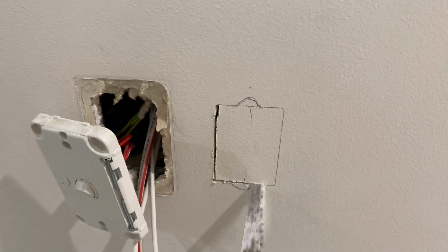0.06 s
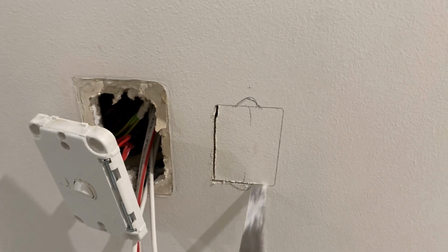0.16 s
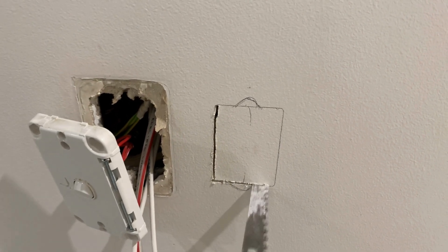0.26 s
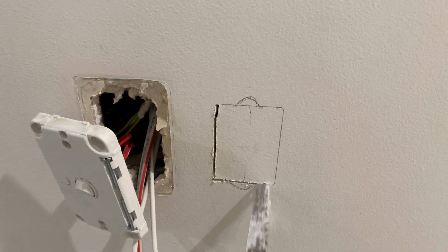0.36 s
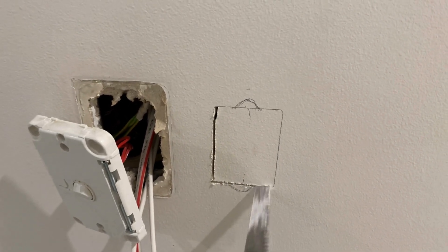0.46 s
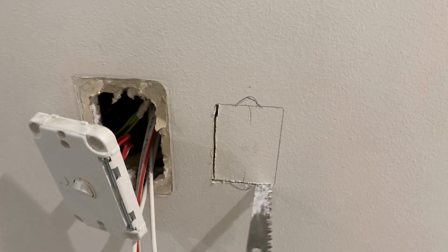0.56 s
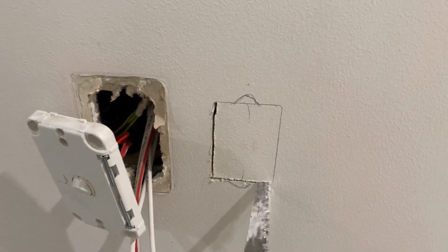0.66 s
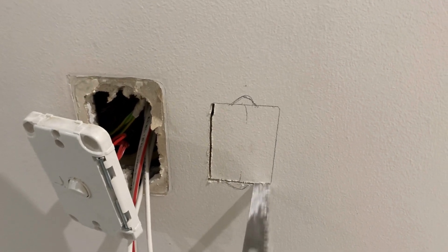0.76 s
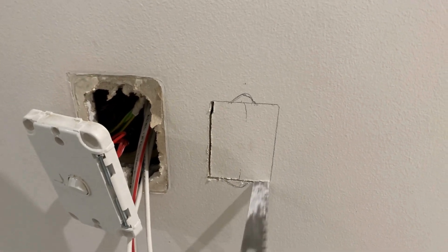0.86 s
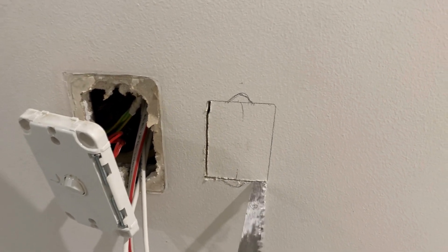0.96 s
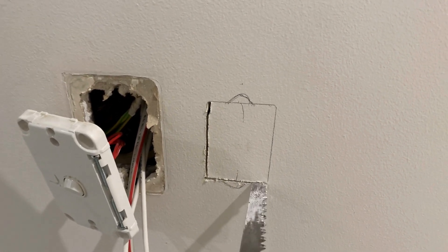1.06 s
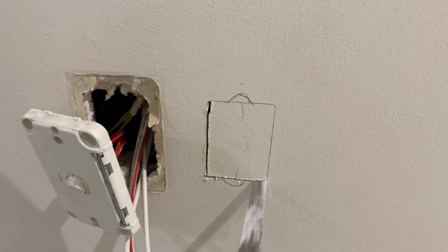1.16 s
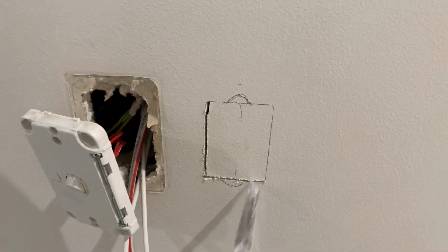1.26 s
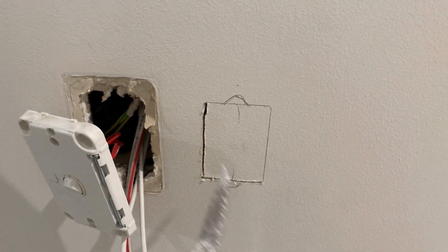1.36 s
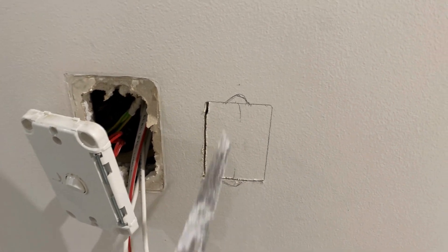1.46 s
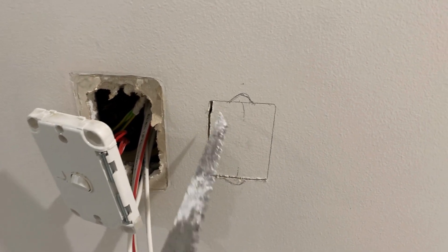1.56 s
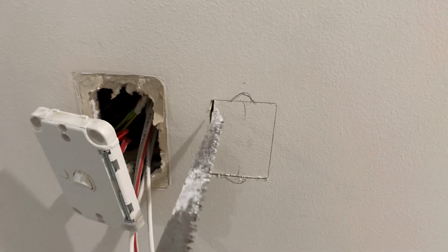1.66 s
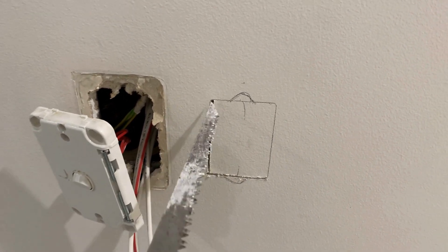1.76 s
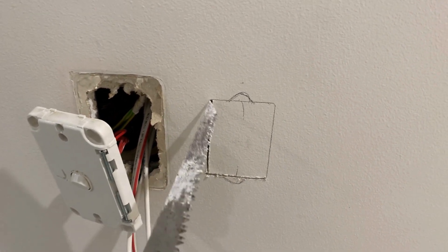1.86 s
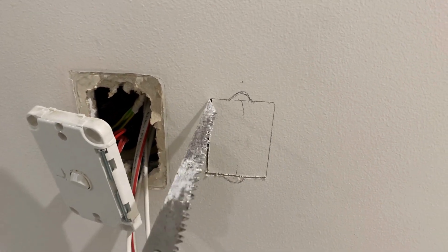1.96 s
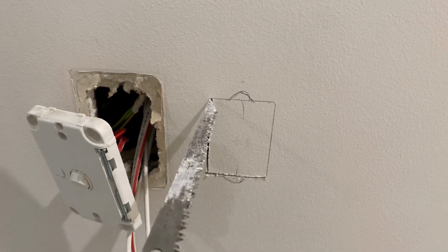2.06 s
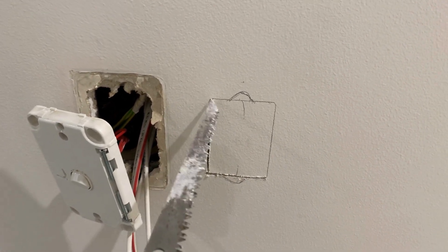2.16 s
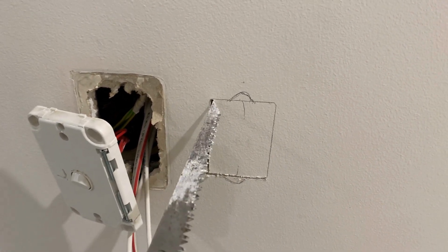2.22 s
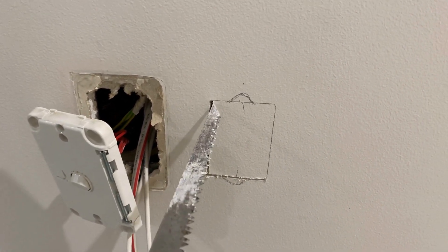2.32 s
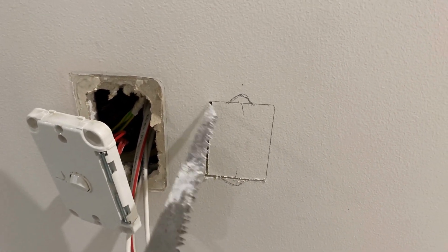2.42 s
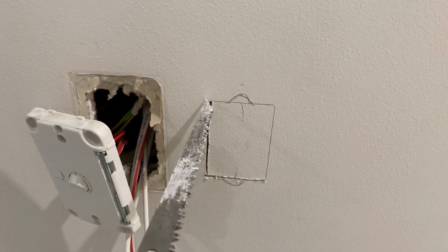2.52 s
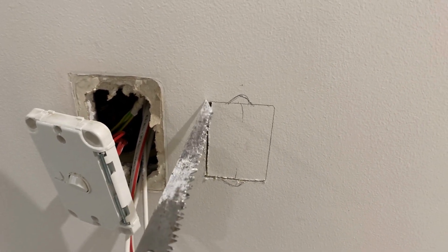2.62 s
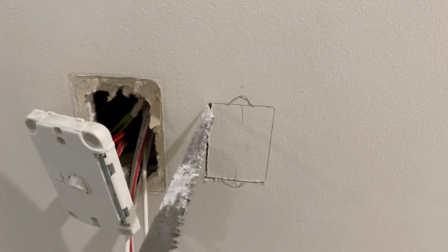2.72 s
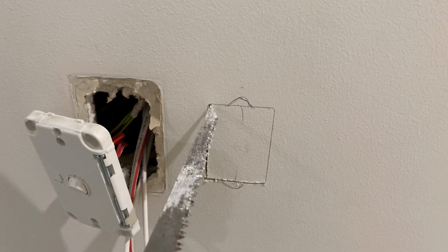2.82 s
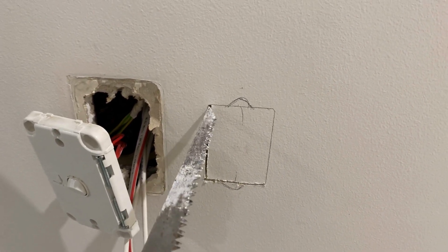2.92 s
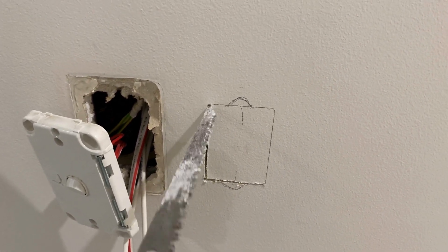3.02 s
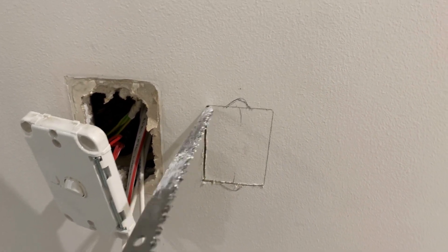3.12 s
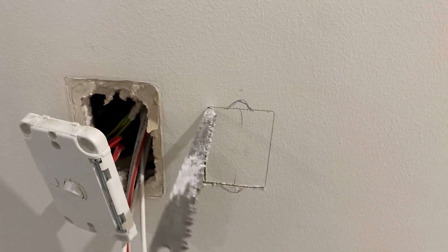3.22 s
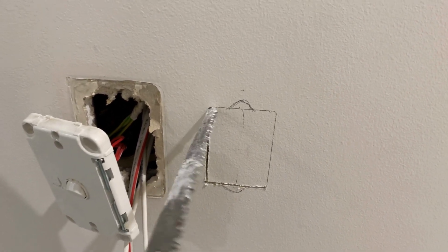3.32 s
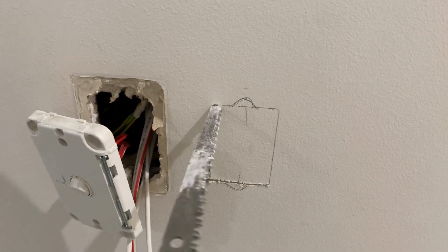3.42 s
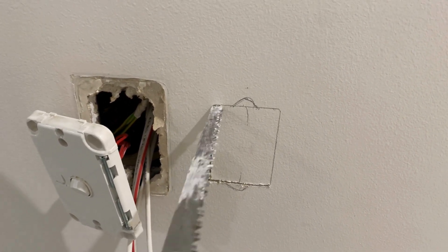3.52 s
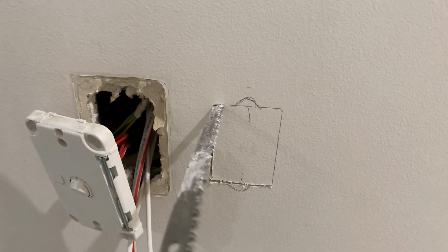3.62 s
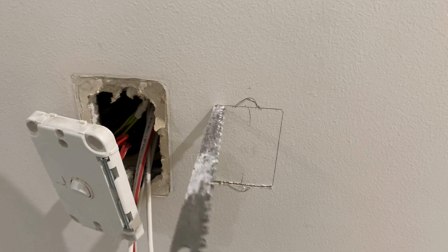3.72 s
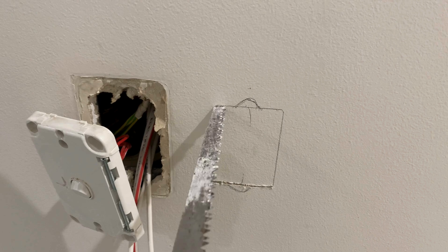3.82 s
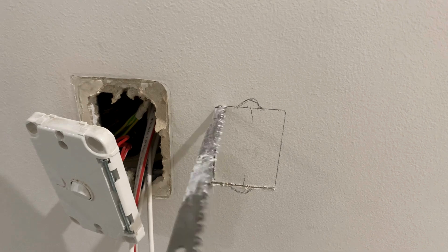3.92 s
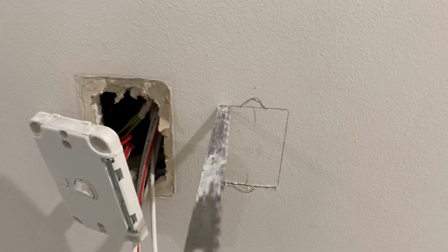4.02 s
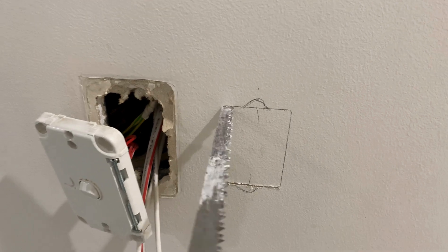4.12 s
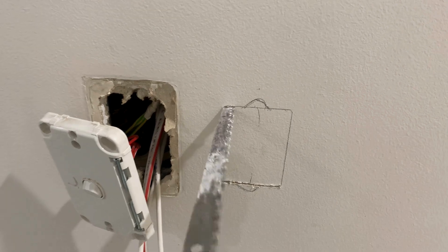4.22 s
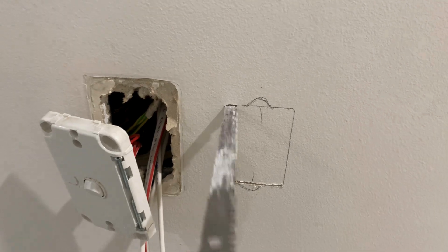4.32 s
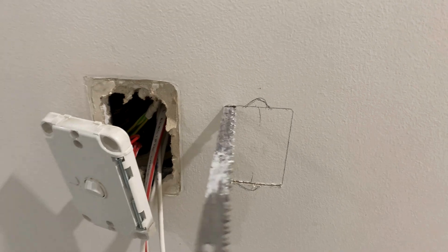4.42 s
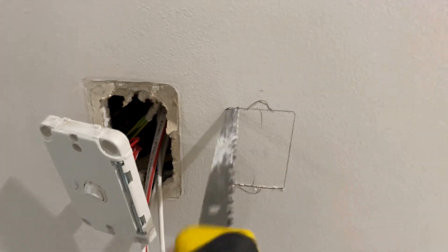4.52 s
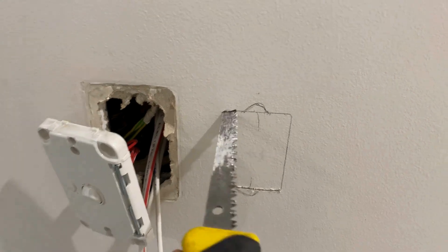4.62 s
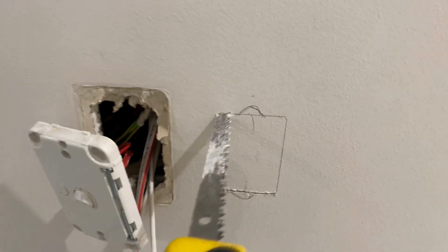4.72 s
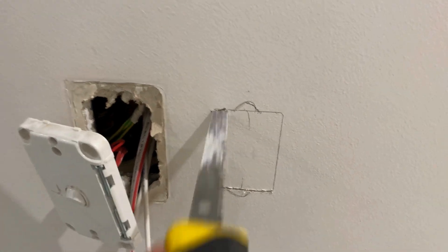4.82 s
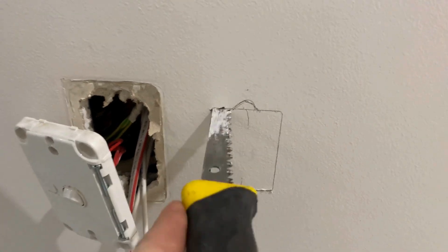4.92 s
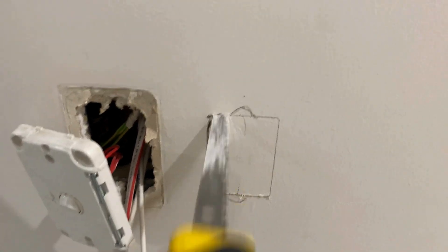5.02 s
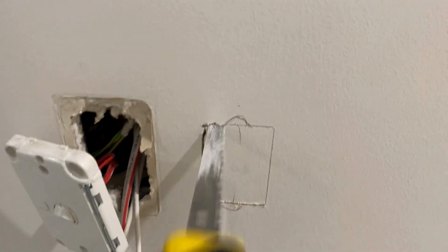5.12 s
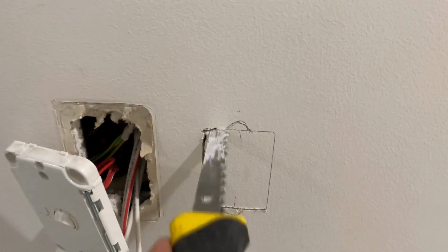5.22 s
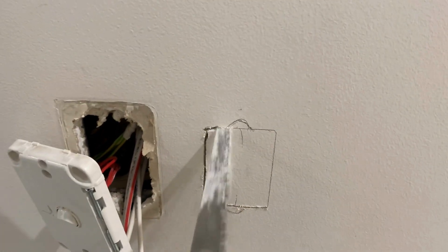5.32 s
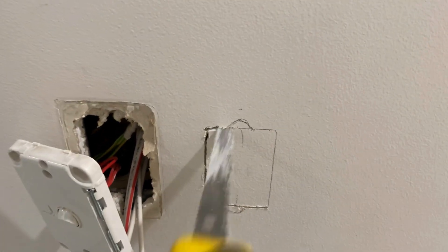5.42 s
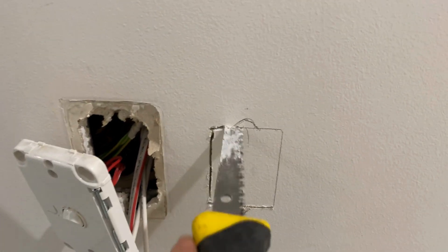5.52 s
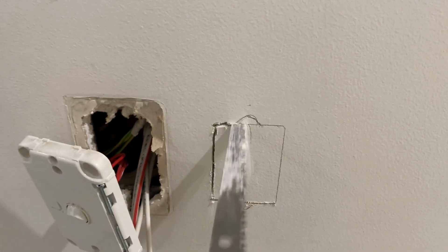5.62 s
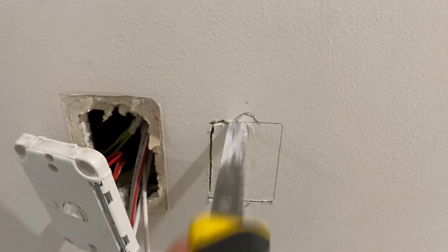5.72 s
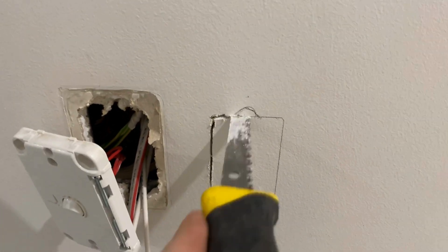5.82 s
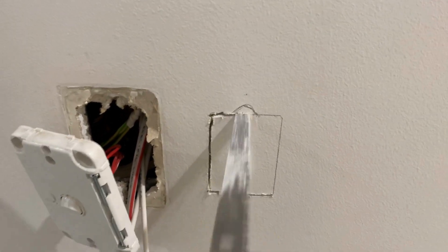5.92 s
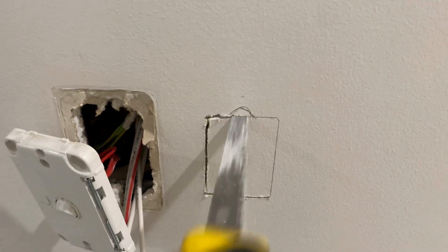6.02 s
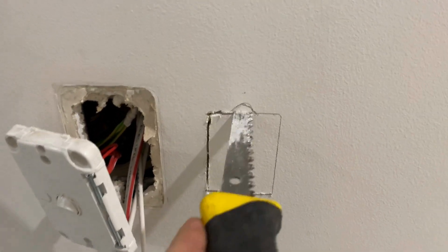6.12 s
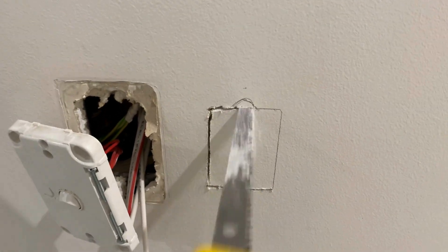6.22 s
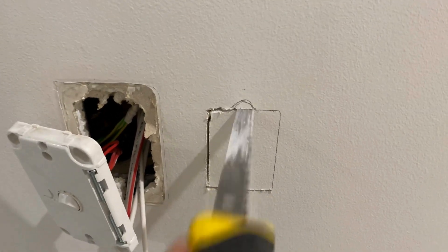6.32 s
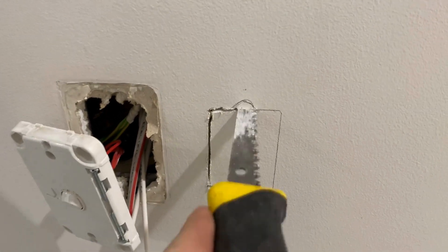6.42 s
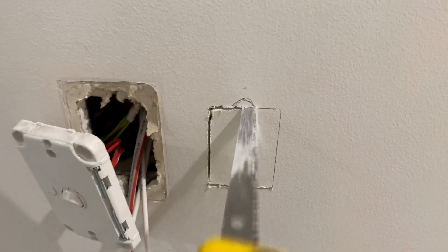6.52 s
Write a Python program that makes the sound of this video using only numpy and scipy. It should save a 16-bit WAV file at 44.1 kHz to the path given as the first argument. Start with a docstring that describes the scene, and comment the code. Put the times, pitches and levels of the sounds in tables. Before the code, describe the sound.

A steel jab saw works in a hollow gypsum wall, heard close in stereo with short indoor echoes. About seven strokes a second thump and rasp, die away, and leave near silence with tiny taps. Quick faint scrapes start a new slot, then loud gritty strokes make the sheet boom until the end, mixed with irregular bumps and brittle crumbs breaking.

```python
"""Quick, rough saw strokes thump and rasp: a hand jab saw cuts a socket hole in a hollow plasterboard wall.
The bout dies away and the tip flicks free; after faint ticks and presses it nibbles lightly, then saws hard.
Each stroke is a row of tooth catches that ring the wall: it thumps and crunches, and gypsum grit rasps
along the steel blade. Bumps, squeaks and snapping crumbs join in, and the sheet booms on the air behind it.
A phone close by hears it through two microphone ports in a small room with quiet air and a faint hum."""
import sys
import numpy as np
from scipy import signal
from scipy.fft import rfft, irfft
from scipy.io import wavfile
from scipy.ndimage import uniform_filter1d

SR = 44100
rng = np.random.default_rng(int(sys.argv[2]) if len(sys.argv) > 2 else 0)


def store_pcm(level_fs):
    """Save levels as 16-bit WAV."""
    pcm = np.round(np.clip(level_fs, -1, 1) * 32767).astype(np.int16)
    wavfile.write(sys.argv[1], SR, np.atleast_2d(pcm).T)


N = 289737
RING = SR // 5  # how long a body may ring, in samples
SLIDE_S = .014  # the blade already slides this long before the teeth catch, and as long after

# Strokes of the blade. Each row: start in seconds, length in seconds, force in dB, bite from 0 (the teeth
# slide over the gypsum) to 1 (they dig in), resonance of the slot in Hz, wall resonance that the stroke
# favours in Hz, push that makes the sheet shudder in dB.
STROKES = [(-.02, .115, -4.5, 0.9, 775, 175, -18), (0.099, .14, -3, .95, 730, 224, -21.5),
           (0.272, .12, -4.5, 0.6, 750, 176, -19.5), (.399, .135, -3.5, 1, 690, 323.7, -19.5),
           (.572, .11, -8.5, 0.8, 671, 179, -21), (0.688, .12, -6, .75, 667, 224.4, -19.5),
           (0.832, .13, -9, .6, 698, 224, -25), (0.956, .11, -11.5, 0.6, 760, 172.6, -31.5),
           (1.096, .125, -12.5, 0.52, 760, 174, -36), (1.213, .09, -21, 0.58, 686, 180, -36),
           (2.989, .074, -45, 0.4, 706, 240, -58), (3.062, .12, -33.5, 0.63, 950, 248, -62),
           (3.146, 0.085, -27.5, 0.1, 950, 338, -60), (3.237, 0.096, -25, 0.17, 905, 260, -55),
           (3.319, 0.11, -24.5, 0.07, 1010, 238, -57.5), (3.414, .083, -24.5, 0.44, 910, 170, -56),
           (3.484, 0.081, -27, 0.35, 1450, 315, -50), (3.572, 0.071, -23.5, 0.35, 1400, 241, -47),
           (3.634, 0.06, -25, 0.24, 1510, 256, -43), (3.727, .047, -29, 0.86, 1450, 322, -49),
           (3.803, .04, -33, 0, 1400, 251, -55), (3.872, 0.0563, -24.5, 0.47, 1500, 253, -49),
           (3.934, 0.051, -22, 0.4, 1500, 243, -48), (4.018, 0.095, -25, .54, 1490, 260, -45),
           (4.174, .049, -24.5, .5, 1530, 322, -48.5), (4.217, .067, -23, 0.46, 1540, 326, -53.5),
           (4.328, 0.1, -16, 0.6, 1500, 218, -31.5), (4.467, .132, -2, 0.6, 833, 225, -19.5),
           (4.694, .08, -8, 0.18, 900, 121, -25.5), (4.797, .13, 1.5, 0.7, 930, 219.6, -28),
           (4.97, .115, -1.5, .48, 790, 147, -19.5), (5.098, .112, 2, 0.6, 1260, 325.6, -21),
           (5.236, .13, 1.5, 0.4, 780, 146, -23), (5.381, .122, 3, .78, 940, 325, -27.5),
           (5.542, .11, -1.5, .25, 870, 247, -18.5), (5.676, .128, 2, .88, 740, 162, -32),
           (5.837, .14, 1, 0.6, 750, 157, -21.5), (5.973, .14, .5, .89, 693, 166, -33),
           (6.149, .125, -1, 0.4, 690, 132, -22), (6.292, .125, -1.5, 1, 730, 237, -29.5),
           (6.434, .13, -1, .52, 737, 138, -17.5)]
# The blade bumps in the slot or a tooth snags hard. Each row: start in seconds, peak level in dB,
# crunch against thud in dB, pitch of the thud in Hz.
BUMPS = [(0.059, -12, -13, 165.7), (0.113, -20.5, -9, 315), (.161, -17, -25, 320), (0.185, -6, -25, 217),
         (0.292, -18, -1, 219), (.327, -11.5, -7.5, 179), (.474, -14.5, -9, 322), (0.49, -2.5, -12.5, 226),
         (.59, -4, -14, 128), (.662, -10, -14, 169), (.736, -7, -8, 231), (0.938, -8, -24, 213.6),
         (1.125, -17, -17.5, 192.6), (1.886, -37.5, -18, 170.3), (2.275, -42.5, -11, 228),
         (2.421, -47, -21.5, 162), (2.484, -37.5, -10, 160), (2.638, -44.5, -4.5, 235),
         (2.896, -37.5, -14, 163), (2.982, -35.5, -36, 174), (3.234, -35.5, -13, 243),
         (3.283, -36, -7, 250.7), (3.422, -33.5, -17, 333), (3.497, -39, -4, 325), (3.578, -44, -2, 255.3),
         (3.879, -38, 16, 320), (4.033, -33.5, -3, 261), (4.19, -29, -14.5, 324), (4.334, -34, 10, 213),
         (4.381, -16.5, -28, 222), (4.47, -27.5, 1, 222), (4.545, -10, -4, 232), (4.751, -11.5, -44, 134),
         (4.825, -18, -27, 223), (4.849, -8, -11.5, 212), (4.997, -14, -8, 258), (5.045, -12.5, -14, 214),
         (5.111, -28, 0, 226), (5.144, -14, 11, 346), (5.3, -4, -20, 151), (5.421, -27, -7, 228),
         (5.568, -13, -10, 245), (5.734, -7.5, 2, 173), (5.852, -6.5, -16, 227.5), (5.886, -14, -12, 171),
         (5.916, -7, -12, 167), (6.024, -13.5, -7, 310), (6.062, -10, -12, 169.6),
         (6.196, -4.5, -15.5, 131.3), (6.313, -7.5, -4, 125.7), (6.331, -10, -18, 243),
         (6.354, -7, -13, 151.5)]
# Ways in which a body rings. Each row: pitch in Hz, width in Hz (wider dies sooner), strength in dB.
SHEET_MODES = [(118, 20, 3.5), (140, 24, -2), (160, 22, -1), (177, 18, -3)]  # the whole sheet between its studs
PANEL_MODES = [(216, 19, 2.5), (234, 22, -1), (253, 22, 1), (325, 20, 2.5)]  # the panel around the cut
BOARD_MODES = [(461, 28, 4.5), (532, 22, 3), (565, 24, -3), (630, 28, -.5), (700, 70, -3.5),
               (775, 50, -1.5), (877, 34, -1.5), (975, 36, -8.5), (1040, 40, -11), (1172, 50, -8.5),
               (1290, 46, -7), (1420, 42, -4.5), (1528, 44, -6), (1642, 44, -5), (2240, 120, -6.5)]  # the board bending at the slot
BLADE_MODES = [(2130, 430, 14.5), (2686.3, 130, 0), (2950, 80, 2.5), (3470, 52, 12), (3790, 19, 12),
               (4620, 30, -7.5), (7600, 110, -1.5), (9300, 280, -4), (11300, 360, -4), (13400, 590, -5.5)]  # the steel blade, ringing faintly


def undb(db):
    """Decibels to gain."""
    return 10 ** (np.asarray(db) / 20)


def unit(x):
    """Scale to rms 1."""
    return x / np.sqrt(np.mean(x ** 2) + 1e-18)


def read(points, hz):
    """Read (Hz, value) points on a log-frequency axis."""
    f, value = np.transpose(points)
    return np.interp(np.log(hz + 1), np.log(f + 1), value)


def add(out, x, start):
    """Mix x into out from a time in seconds."""
    i = int(start * SR)
    x = x[max(-i, 0):len(out) - i]
    out[max(i, 0):max(i, 0) + len(x)] += x


def colour(points, size=1024):
    """Short impulse response with the given spectrum; it starts at once (minimum phase)."""
    level_db = read(points, np.fft.rfftfreq(size, 1 / SR))
    cepstrum = np.fft.irfft(np.log(undb(level_db)))
    cepstrum[1:size // 2] *= 2
    cepstrum[size // 2 + 1:] = 0
    return irfft(np.exp(rfft(cepstrum)))


def ring(modes, scatter_db=2.0, detune=.008):
    """Impulse response of damped modes; their balance and tuning shift with the point of contact."""
    hz, width, db = np.transpose(modes)[:, :, None]
    chance = rng.standard_normal((2, len(modes), 1))
    t = np.arange(RING) / SR
    gain = undb(db + scatter_db * chance[0]) * 2 * np.pi * width / SR
    swing = np.cos(2 * np.pi * hz * (1 + detune * chance[1]) * t)
    modal = np.sum(gain * np.exp(-np.pi * width * t) * swing, axis=0)
    # a body radiates little outside the range of its modes
    edges = [.83 * hz.min(), min(1.17 * hz.max(), .45 * SR)]
    return signal.sosfilt(signal.butter(3, edges, "band", fs=SR, output="sos"), modal)


def knock(hz, width_hz):
    """Impulse response of one wall resonance, driven right at the blade so that it speaks at once."""
    t = np.arange(RING) / SR
    swing = np.exp(-np.pi * width_hz * t) * np.sin(2 * np.pi * hz * t)
    return signal.sosfilt(signal.butter(2, hz / 2, "high", fs=SR, output="sos"), swing)


def swept(x, hz, width_hz):
    """A resonance whose centre can move; gain 1 at the centre."""
    turn = np.exp(2j * np.pi * np.cumsum(hz) / SR)
    keep = np.exp(-np.pi * width_hz / SR)
    return 2 * np.real(turn * signal.lfilter([1 - keep], [1, -keep], x / turn))


def sound(force, response):
    """A force rings a body; the whole sound is scaled to rms 1 over the length of the force."""
    y = np.zeros(len(force) + RING)
    add(y, signal.fftconvolve(force, response), 0)
    return y / np.sqrt(np.sum(y ** 2) / len(force) + 1e-18)


def grains(n, per_s, spread_db):
    """Random clicks, a few larger than the rest."""
    hit, rarity, side = rng.random((n, 3)).T
    size = undb(-spread_db * np.log(np.maximum(rarity, .02)))
    return unit((hit < per_s / SR) * size * np.sign(side - .5))


def spots(n):
    """A value that wanders as the teeth meet harder and softer spots; spread near 1."""
    patch_s = 0.01215  # time that one spot spends under the teeth
    hardness = rng.standard_normal(40)
    return np.interp(np.arange(n) / SR / patch_s, np.arange(len(hardness)), hardness)


def bout_at(time):
    """The row of the bout of sawing that is under way."""
    # Sawing along the bottom of the hole, nibbling a new slot, sawing along the top. Each row:
    # start in seconds, place of top speed in a stroke from 0 to 1, boom in dB, its change as the cut grows
    # in dB per second, thud in dB, favoured wall resonance in dB, board modes above 1000 Hz in dB,
    # blade ring in dB.
    bouts = [(-.05, 0.55, -5, 1, -16.5, -15, -2, -2), (3, .32, -27.5, 6, -22, -25, -16, -6),
             (4.4, .47, -17, 4.5, -24, -22, -2, -9)]
    return bouts[sum(time >= bout[0] for bout in bouts[1:])]


def blade_speed(length, top):
    """The blade speeds up from rest and stops again; 1 at top speed."""
    n = int(length * SR)
    along = np.arange(n) / n
    phase = np.interp(along, [0, np.clip(top, .2, .8), 1], [0, .5, 1])
    return np.sin(np.pi * phase) + 1e-6


def teeth(speed, rate_hz, jitter, scatter_db):
    """One impulse for each tooth that breaks through the gypsum, unevenly spaced and sized."""
    travel = np.cumsum(speed / np.mean(speed)) * rate_hz / SR
    chance = rng.standard_normal((64, 2))
    at = np.searchsorted(travel, np.arange(len(chance)) + .5 + jitter * chance[:, 0])
    force = np.zeros(len(speed) + 1)
    force[at] = undb(scatter_db * chance[:, 1])
    return force[:-1]  # teeth beyond the stroke's end fell on the last sample


def rasp(crumble, length, top, force_db, blade_db):
    """Grit rubs along the blade and rings it; a light stroke rolls fewer grains."""
    # The hiss of the grit. Each row: frequency in Hz, level in dB.
    grit = [(400, -31), (1200, 4.5), (1900, 9.5), (2300, 3.5), (2900, 5), (3700, 6.5), (5200, 4),
            (7000, -0.5), (9500, 2), (12500, 0.5), (15500, -0.5)]
    speed = blade_speed(length + 2 * SLIDE_S, top)
    n = len(speed)
    supply = np.ones(n)
    add(supply, 2.0 * crumble, SLIDE_S)
    rolling = grains(n, per_s=12000 * undb(0.23 * force_db), spread_db=3.0)
    rub = rolling * supply * speed ** 1.09 * undb(1.5 * spots(n))
    blade = sound(rub, ring(BLADE_MODES, scatter_db=4.5, detune=0.011))
    return sound(rub, colour(grit)) + undb(blade_db) * blade


def stroke(start, length, force_db, bite, slot_hz, wall_hz):
    """Teeth catch one by one and ring sheet, panel and board; grit rasps a little before and after."""
    # The dull noise under the crunch. Each row: frequency in Hz, level in dB per Hz.
    crunch_noise = [(380, -25), (560, -2), (850, 0), (1150, -5), (1600, -7), (1900, -14), (2400, -15),
                    (4000, -28), (9000, -48)]
    since, top, boom_db, boom_db_per_s, thud_db, favoured_db, upper_db, blade_db = bout_at(start)
    speed = blade_speed(length, top)
    n = len(speed)
    # typical catches per second, and the relative spread from stroke to stroke
    rate_hz = 148 * np.exp(.1 * rng.standard_normal())
    catches = teeth(1.185 + speed, rate_hz, jitter=.13, scatter_db=2.0)
    catches = catches * undb(2 * spots(n))  # hard and soft spots spread the force by 2 dB
    # after each catch the gypsum crumbles for a few ms
    crumble = unit(signal.lfilter([1], [1, -np.exp(-1 / (0.009 * SR))], catches))
    force = unit(catches) + 0.72 * crumble * grains(n, per_s=3200, spread_db=2.5)

    boom = sound(force * speed ** 0.05, ring(SHEET_MODES))
    thud = sound(force * speed ** 0.78, ring(PANEL_MODES))
    # where and how stiffly the blade is held favours one resonance of the wall
    favoured = sound(force * speed ** 0.13, knock(wall_hz, width_hz=24))

    # tilt across the board modes, in dB per octave: a deep bite favours the lower ones
    tilt_db = -9.5 * bite
    lowest_hz = BOARD_MODES[0][0]
    board = [(hz, width, db + tilt_db * np.log2(hz / lowest_hz) + upper_db * (hz > 1000))
             for hz, width, db in BOARD_MODES]
    blows = force * speed ** 1.35
    # the slot's resonance rises over the stroke and wanders from spot to spot
    centre_hz = slot_hz * np.exp(0.12 * np.linspace(-.5, .5, n) + 0.076 * spots(n))
    blows = blows + undb(1) * swept(blows, centre_hz, width_hz=360)
    crunch = undb(0.5) * sound(blows, ring(board, scatter_db=2.5, detune=0.0021))
    crunch = crunch + undb(-15.5) * sound(blows, colour(crunch_noise))

    # digging teeth shake the slot, not the whole sheet: less boom, more thud and crunch
    boom_db = boom_db + boom_db_per_s * (start - since) - 13 * bite
    wall = undb(boom_db) * boom + undb(favoured_db) * favoured
    wall = wall + undb(thud_db + 7 * bite) * thud + undb(-29.5 + 11.5 * bite) * crunch
    out = undb(-32) * rasp(crumble, length, top, force_db, blade_db)
    add(out, wall, SLIDE_S)
    return undb(force_db) * out


def sawing():
    """All strokes in turn, each heard from the moment the blade starts to slide."""
    out = np.zeros(N)
    for *row, _ in STROKES:
        add(out, stroke(*row), row[0] - SLIDE_S)
    return out


def shudder():
    """Strokes and bumps rock the sheet on the air of the cavity; the rocking builds and fades a little late."""
    # The sheet bouncing on the air behind it. Each row: pitch in Hz, width in Hz, strength in dB.
    cavity_modes = [(63.8, 7.5, -0.5), (92, 36, -37.5)]
    bump_db, bump_push_s = -23.5, 0.0077  # a bump's push: level against its peak, and for how long
    drag = np.zeros(N)
    for start, length, *_, shudder_db in STROKES:
        add(drag, np.full(int(length * SR), undb(shudder_db)), start)
    for start, db, *_ in BUMPS:
        add(drag, np.full(int(bump_push_s * SR), undb(db + bump_db)), start)
    for lag_s in (0.02, 0.06):
        keep = np.exp(-1 / (lag_s * SR))
        drag = signal.lfilter([1 - keep], [1, -keep], drag, zi=drag[:1])[0]
    boom = signal.fftconvolve(rng.standard_normal(N + RING), ring(cavity_modes))[RING:RING + N]
    steady_boom = boom / np.sqrt(uniform_filter1d(boom ** 2, SR // 8) + 1e-18)
    return drag * steady_boom


def house():
    """Quiet air, alike at both ports in the bass, and a faint appliance hum of steady tones."""
    # Still air of the house, the part both ports share. Each row: frequency in Hz, level in dB per Hz.
    air_points = [(30, -83.8), (65, -80.6), (150, -88.4), (290, -88.9), (450, -102.5), (850, -104.5),
                  (1500, -114.5), (2500, -124), (5000, -128.5), (9000, -134.2), (15000, -143.9)]
    # The appliance's tones. Each row: pitch in Hz, rms level in dB.
    hum_tones = [(100, -58), (291, -72)]
    hz = np.fft.rfftfreq(N, 1 / SR)
    noise = rfft(rng.standard_normal((2, N)))
    mid, side = noise * undb(read(air_points, hz)) * np.sqrt(SR / 2)
    air = irfft(mid + np.array([[1], [-1]]) * side * np.minimum(hz / 1500, 1), N)
    t = np.arange(N) / SR
    hum = sum(np.sqrt(2) * undb(db) * np.sin(2 * np.pi * f * t) for f, db in hum_tones)
    return air + hum


def nearby(dry, echo_db, decay_s):
    """Treble scatters off the wall, the hand and the hanging socket plate, and reaches each port differently."""
    t = np.arange(SR // 40) / SR
    noise = rng.standard_normal((2, len(t)))
    echoes = signal.lfilter(*signal.butter(2, [1300, 12000], "band", fs=SR), noise)
    echoes = unit(echoes * np.exp(-t / decay_s) * (t > .0005)) / np.sqrt(len(t))
    return dry + undb(echo_db) * signal.fftconvolve(dry[None], echoes, axes=1)[:, :N]


def room(dry, wet_db, t60):
    """Diffuse echoes of a small room, different at each port; they fall by 60 dB in t60 seconds."""
    t = np.arange(SR * 3 // 4) / SR
    noise = rng.standard_normal((2, len(t)))
    # long waves reach both ports alike, and in the bass the near wall outweighs the room
    low_difference = signal.filtfilt(*signal.butter(1, 330, fs=SR), noise[0] - noise[1])
    noise = noise + np.array([[-.5], [.5]]) * low_difference
    noise = signal.lfilter(*signal.butter(1, 260, "high", fs=SR), noise)
    tail = noise * undb(-60 * t / t60)
    # the echoes set in after 3 ms
    tail *= np.clip((t - .003) / 0.00097, 0, 1) * np.sqrt(2 * np.log(1000) / (t60 * SR))
    return undb(wet_db) * signal.fftconvolve(dry[None], tail, axes=1)[:, :N]


def bumps():
    """Blows of the blade on the wall, each with the pitch of the spot it meets; the teeth scuff briefly after."""
    out, t = np.zeros(N), np.arange(SR // 15) / SR
    lowest_hz = BOARD_MODES[0][0]
    # the board modes fall by 5 dB more per octave
    board_modes = [(hz, width, db - 5 * np.log2(hz / lowest_hz)) for hz, width, db in BOARD_MODES]
    for start, db, crunch_db, pitch_hz in BUMPS:
        force = .03 * grains(len(t), per_s=1500, spread_db=1.5) * np.exp(-t / .022)
        force[0] += 1
        other_modes = unit(ring(SHEET_MODES) + ring(PANEL_MODES))
        wall = unit(knock(pitch_hz, width_hz=26)) + undb(-5) * other_modes
        wall = wall + undb(crunch_db) * unit(ring(board_modes))
        top_hz = min(2000 * 2 ** (crunch_db / 30), 6000)  # a crunchier blow is brighter
        blow = signal.lfilter(*signal.butter(2, top_hz, fs=SR), sound(force, wall))
        add(out, undb(db) * blow / np.max(np.abs(blow)), start)
    return out


def turns():
    """Between hard strokes the blade stays pressed in the slot, grinding on the wall and ringing."""
    longest_gap_s, pressed_db = .12, -16  # only strokes harder than this keep the blade pressed
    out = np.zeros(N)
    wall = ring(SHEET_MODES + PANEL_MODES) + undb(-15) * ring(BOARD_MODES)
    blade = ring(BLADE_MODES)
    for (start, length, force_db, *_), (next_start, _, next_db, *_) in zip(STROKES, STROKES[1:]):
        gap = next_start - start - length
        if 0 < gap < longest_gap_s and force_db > pressed_db:
            n = int((gap + 4 * SLIDE_S) * SR)
            rub = grains(n, per_s=2500, spread_db=1.0) * np.sin(np.linspace(0, np.pi, n))
            *_, blade_db = bout_at(start)
            grind = undb(-30.5) * sound(rub, wall) + undb(-42.5 + blade_db) * sound(rub, blade)
            add(out, undb((force_db + next_db) / 2) * grind, start + length - 2 * SLIDE_S)
    return out


def squeaks():
    """Stick and slip feed one blade mode for a moment: a rough, narrow tone made from filtered noise."""
    # The blade sticks in the cut. Each row: start in seconds, length in seconds, pitch in Hz, level in dB.
    sticking = [(0.161, .022, 2946, -32.5), (0.167, 0.037, 2340, -34.5), (0.469, .04, 2450, -42.5),
                (5.116, 0.025, 2360, -36.5), (5.424, 0.066, 2250, -36.5), (5.521, .13, 2174, -39)]
    out = np.zeros(N)
    for start, length, hz, db in sticking:
        n = int(length * SR)
        tone = swept(rng.standard_normal(RING), np.full(RING, hz), width_hz=44)[-n:]
        add(out, undb(db) * unit(tone * np.sqrt(np.hanning(n))), start)
    return out


def snaps():
    """A crumb of gypsum breaks off in a short, bright burst of cracks."""
    # Each row: time in seconds, peak level in dB.
    crumbs = [(1.272, -27.5), (3.441, -35.5), (3.512, -37.5), (4.235, -35), (4.816, -25), (4.987, -21),
              (5.603, -18), (5.618, -25), (5.6395, -27), (5.687, -21), (6.2948, -17.5), (6.445, -28)]
    out, t = np.zeros(N), np.arange(SR // 40) / SR
    for start, db in crumbs:
        burst = grains(len(t), per_s=23000, spread_db=3.5) * t * np.exp(-t / .003)
        crack = signal.lfilter(*signal.butter(1, 5500, "high", fs=SR), burst)
        add(out, undb(db) * crack / np.max(np.abs(crack)), start - .001)  # it swells from 1 ms before
    return out


def flicks():
    """The steel tip slips and chatters for a few ms; it pings when free and only ticks when the board damps it."""
    # The tip flicks free of the slot or ticks against its edge. Each row: start in seconds, peak level in dB,
    # damping as a factor on the mode widths.
    slips = [(1.273, -28.5, 1.5), (2.277, -54, 3), (2.643, -53, 6.5), (2.89, -54, 8.8)]
    # The ringing of the steel tip. Each row: pitch in Hz, width before damping in Hz, strength in dB.
    tip_modes = [(2580, 130, 6), (2780, 180, 1), (4050, 260, -2), (4380, 220, -1), (6200, 600, -11),
                 (7400, 800, -12)]
    out, t = np.zeros(N), np.arange(SR // 50) / SR
    for start, db, damping in slips:
        slip = .3 * grains(len(t), per_s=6000, spread_db=3) * np.exp(-t / .006)
        slip[0] += 1
        damped = [(hz, width * damping, mode_db) for hz, width, mode_db in tip_modes]
        ping = sound(slip, ring(damped))
        add(out, undb(db) * ping / np.max(np.abs(ping)), start)
    return out


def presses():
    """The tip is worked into the board: sparse grains give way under it and rumble faintly in the wall."""
    # Each row: start in seconds, length in seconds (cut to 0.2), level in dB.
    pushes = [(2.52, .19, -61.5), (2.701, 0.21, -63.5), (2.919, 0.11, -56), (3.03, 0.11, -53)]
    out = np.zeros(N)
    for start, length, db in pushes:
        n = min(int(length * SR), RING)
        rub = grains(n, per_s=350, spread_db=0.5) * np.sin(np.linspace(0, np.pi, n))
        wall = ring(SHEET_MODES + PANEL_MODES) + undb(-19.5) * ring(BOARD_MODES)
        add(out, undb(db) * sound(rub, wall), start)
    return out


def scene():
    """The saw in the wall, heard in the room."""
    saw = undb(-4.5) * sawing() + shudder() + bumps() + turns()
    saw = saw + squeaks() + snaps() + flicks() + presses()
    echo = room(saw, wet_db=-6.5, t60=.42)
    return nearby(saw, echo_db=-10.5, decay_s=0.027) + echo + house()


def record(dry):
    """The two ports hear with different colour and phase; the phone rounds peaks and cuts the top."""
    # How the ports differ in loudness. Each row: frequency in Hz, left minus right in dB.
    port_db = [(60, -1.6), (200, -3), (380, -2.5), (600, 1.6), (1400, -3.6), (2380, -1.5), (3300, 1),
               (4600, 4), (6000, 6.5), (8000, -0.5)]
    # How they differ in phase. Each row: frequency in Hz, lead of the left port in radians.
    port_phase = [(60, 0.15), (650, 0.28), (1400, 0.65), (2200, 1.9), (3000, 1.55), (4300, 1.4),
                  (6000, 1.0), (8000, 0.25)]
    hz = np.fft.rfftfreq(N, 1 / SR)
    half = np.array([[.5], [-.5]])  # each port takes half of the difference
    gain = undb(half * read(port_db, hz)) * np.exp(1j * half * read(port_phase, hz))
    ports = irfft(rfft(dry) * gain, N)
    rounded = ports / (1 + ports ** 4) ** (1 / 4)
    return signal.sosfilt(signal.ellip(14, .2, 70, 15700, fs=SR, output="sos"), rounded)


dry = scene()
out = record(dry)
store_pcm(out)
```